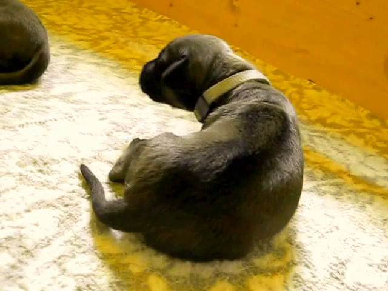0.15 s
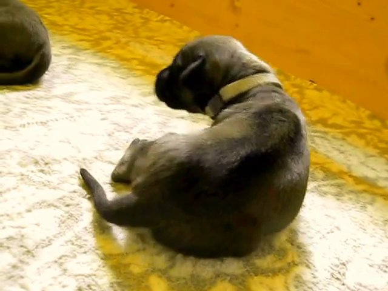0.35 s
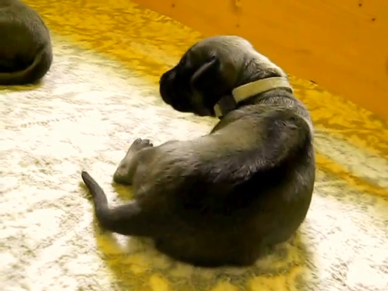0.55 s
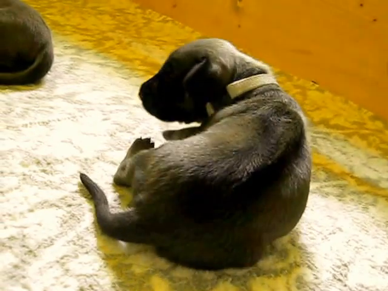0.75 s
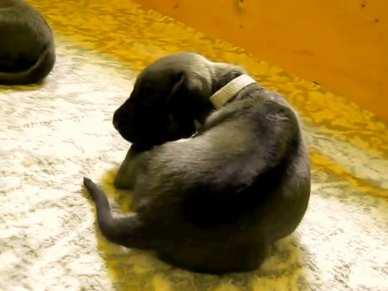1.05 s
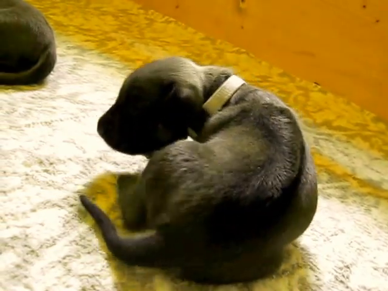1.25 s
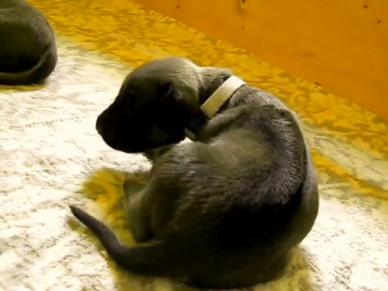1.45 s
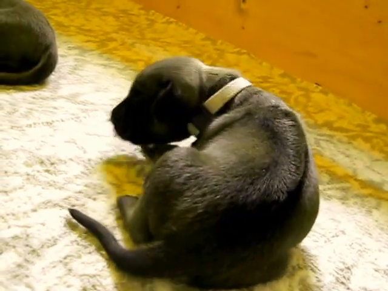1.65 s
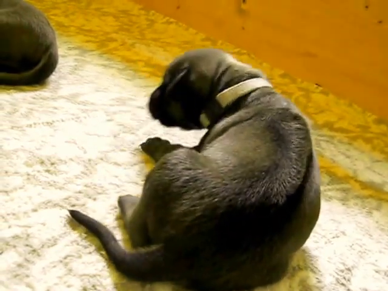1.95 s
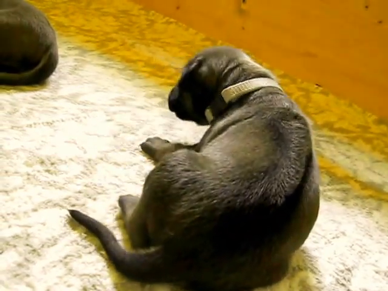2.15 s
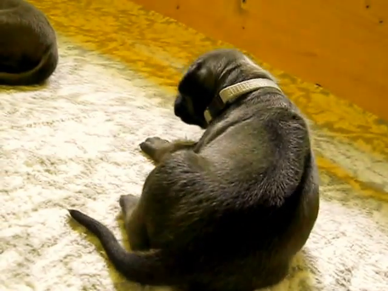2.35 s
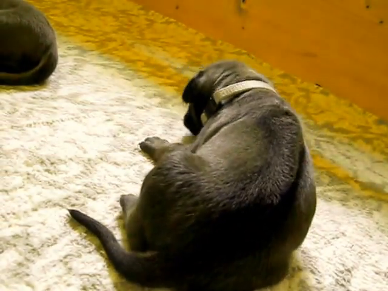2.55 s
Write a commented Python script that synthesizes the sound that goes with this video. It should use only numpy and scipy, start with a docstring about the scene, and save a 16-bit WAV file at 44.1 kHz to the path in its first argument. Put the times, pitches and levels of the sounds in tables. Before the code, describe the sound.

A young puppy whimpers six short squeaky cries, each lower than the last, in a small room.

```python
"""Under a faint bed of coloured noise for room hiss, a young puppy whimpers six times, each cry lower than the last.
The cries are arched stacks of partials with a pop in front, a rough catch at both ends and rasping air on top.
Noise puffs trail the second and third; the fourth and longest breaks into a lower octave. Then come two wet
clicks of dying noise, three grainy strokes of bedding, the fifth cry, one more click and the lowest cry.
Short echoes, a diffuse tail and ringing modes put it all in a small room."""
import sys
import numpy as np
from scipy import signal
from scipy.fft import rfft, irfft, next_fast_len
from scipy.io import wavfile
from scipy.ndimage import uniform_filter1d, map_coordinates

SR = 44100
rng = np.random.default_rng(int(sys.argv[2]) if len(sys.argv) > 2 else 0)


def log_audio(samples):
    """Write samples as a 16-bit WAV file to the path given in sys.argv[1]."""
    # one column per channel
    frames = np.atleast_2d(samples).T
    # limit to full scale, then quantise
    limited = np.clip(frames, -1, 1)
    pcm = np.round(limited * 32767).astype(np.int16)
    wavfile.write(sys.argv[1], SR, pcm)


N = 119070
TOP_HZ = 15850  # band limit of the cries and of the whole mix


def amp(db):
    """Decibels to gain."""
    return 10 ** (np.asarray(db) / 20)


def unit(x):
    """Scale to rms 1."""
    return x / np.sqrt(np.mean(x ** 2) + 1e-20)


def along(points, hz):
    """Read a curve of (Hz, value) points on a log frequency axis."""
    point_hz, values = np.transpose(points)
    return np.interp(np.log(hz + 1), np.log(point_hz + 1), values)


def wobble(rate, span=slice(None)):
    """A smooth random curve, rate knots a second."""
    knots = rng.standard_normal(N // 8)
    return map_coordinates(knots, [np.arange(N)[span] * rate / SR], mode="mirror")


def filtered(x, response):
    """Shape the spectrum of x by a response of frequency."""
    size = next_fast_len(N + SR // 2)
    return irfft(rfft(x, size) * response(np.fft.rfftfreq(size, 1 / SR)), size)[:N]


def noise(colour):
    """Coloured noise of rms 1."""
    return unit(filtered(rng.standard_normal(N), lambda hz: amp(along(colour, hz))))


FLOOR_DB = -55
# Colour of the room hiss: (frequency [Hz], relative density [dB per Hz])
FLOOR = [(25, -7), (300, 0), (1000, -3.5), (2200, -8.5), (9600, -15), (15500, -22)]


def hiss():
    """Steady coloured noise, the faint bed under everything."""
    return amp(FLOOR_DB) * noise(FLOOR)


ROOM_DB, ROOM_DELAY_S, MODE_T60 = -11, .012, 0.33  # tail level, delay of tail and modes, mode decay [s]
# Early echoes off near walls: (delay [s], gain [signed factor])
WALLS = [(.0031, 0.13), (.0074, -.14), (0.0116, .12), (0.0234, .1)]
# Decay of the diffuse tail: (frequency [Hz], time to fall 60 dB [s])
ROOM_T60 = [(300, 0.42), (1000, 0.33), (2000, 0.15), (14000, 0.34)]
# Standing waves of the room: (frequency [Hz], level [dB])
ROOM_MODES = [(646, -1), (785, -2), (1077, -12), (1600, -5), (1935, -3.5)]


def room(x):
    """A few near walls, then a diffuse tail that dies fastest near 2 kHz, and standing waves that ring on."""
    hz, t, grains = signal.stft(rng.standard_normal(SR // 2), SR, nperseg=256)
    decay = amp(-60 * t / along(ROOM_T60, hz)[:, None])
    tail = signal.istft(grains * decay, SR, nperseg=256)[1]
    t = np.arange(len(tail)) / SR
    fade = amp(-60 * t / MODE_T60)
    modes = sum(amp(db) * np.cos(2 * np.pi * f * t) for f, db in ROOM_MODES)
    ring = 2 * fade / fade.sum() * modes
    late = signal.fftconvolve(x, amp(ROOM_DB) * tail / np.linalg.norm(tail) + ring)[:N]
    early = filtered(x, lambda f: sum(g * np.exp(-2j * np.pi * f * s) for s, g in WALLS))
    return early + filtered(late, lambda f: np.exp(-2j * np.pi * f * ROOM_DELAY_S))


# Paws brush the bedding: (centre time [s], time from centre to 1/e [s], level [dB])
RUSTLES = [(1.833, 0.021, -48.5), (1.885, 0.018, -50.5), (1.942, 0.025, -53.5)]
# Colour of the rustle: (frequency [Hz], relative level [dB])
RUSTLE_COLOUR = [(150, -3), (1200, 4), (4200, -6.5), (15000, -23)]


def bedding():
    """Short strokes over the fleece: noise made grainy by a fast random level."""
    t = np.arange(N) / SR
    strokes = sum(amp(db) * np.exp(-((t - s) / spread) ** 2) for s, spread, db in RUSTLES)
    grain = amp(3.4 * wobble(600))
    return strokes * unit(noise(RUSTLE_COLOUR) * grain)


PUFF_SPREAD_S = 0.015  # from the centre to 1/e
# Puffs of air: (centre time [s], level [dB])
PUFFS = [(0.79, -53.5), (1.182, -46.5)]
# Colour of the puffs: (frequency [Hz], relative level [dB])
PUFF_COLOUR = [(1500, 3), (2900, 3), (6000, 14), (9000, 4), (15000, 1)]


def puffs():
    """Air escapes through the puppy's nose as a cry lets go."""
    t = np.arange(N) / SR
    swells = sum(amp(db) * np.exp(-((t - s) / PUFF_SPREAD_S) ** 2) for s, db in PUFFS)
    return noise(PUFF_COLOUR) * swells


CLICK_T60 = 0.02  # time to fall 60 dB [s]
# Wet mouth clicks: (time [s], level at onset [dB])
CLICKS = [(1.7354, -33.5), (1.751, -45), (2.319, -43)]
# Colour of the clicks: (frequency [Hz], relative level [dB])
CLICK_COLOUR = [(200, -19), (1000, 8), (2600, -6), (3600, 0.5), (5500, -3.5), (15000, -11)]


def mouth():
    """Each click is a burst of noise that starts hard and dies at once."""
    t = np.arange(N) / SR
    bursts = sum((t >= s) * amp(db - 60 * np.abs(t - s) / CLICK_T60) for s, db in CLICKS)
    return noise(CLICK_COLOUR) * bursts


POP_RISE_S, POP_LEAD_S = 0.0063, 0.00439  # time to the peak, head start on the cry
# The mouth, rung as the folds burst open: (frequency [Hz], level [dB])
POP_MODES = [(600, -10), (1150, -1.5), (1750, -31)]


def pop(start, pop_db):
    """The folds burst open and ring the mouth for a few cycles."""
    t = np.maximum(np.arange(N) / SR - start + POP_LEAD_S, 0)
    u = t / POP_RISE_S
    swell = (u * np.exp(1 - u)) ** 2
    return amp(pop_db) * swell * sum(amp(db) * np.sin(2 * np.pi * hz * t) for hz, db in POP_MODES)


ATTACK_S, RELEASE_S, ROUGH_END_S = .005, 0.0066, 0.0081
GLIDE_S = 0.0033  # pitch is averaged over this, to round its corners
UPPER_HZ = 1660  # the high overtones begin here and have their full trim an octave up
JITTER, JITTER_HZ, SHIMMER_DB = 0.0014, 448.5, 0.5  # clean voice: share of pitch, knots a second, level
CATCH_JITTER, BREAK_JITTER = 0.088, 0.012  # added jitter where it catches or breaks, share of pitch
CATCH_SUB = 0.43  # gain of the in-between partials in the catch
CATCH_BRIGHT_DB = 0.5  # tight folds lift the second harmonic
BREAK_DULL_DB = -6  # the break drains the third harmonic
FLUTTER_DB, FLUTTER_HZ = 1.94, 69.8  # each partial wavers on its own, more in the break (knots a second)
BREAK_SLIP, SLIP_HZ = 0.34, 130  # in-between partials slip out of step (radians, knots a second)
RASP_DB, CATCH_RASP_DB = -33, 12.5  # air against the voice, and its lift in catch or break
# One table for each cry: (time [s], pitch [Hz], level [dB])
CRY_1 = [(0.223, 848, -31), (0.236, 877, -26.5), (0.254, 986, -28.5), (0.274, 1190, -17.5),
         (0.296, 1279, -21.5), (0.33, 1164, -20.5), (0.351, 1137, -21.5), (0.36, 1060, -31)]
CRY_2 = [(0.629, 724, -34), (0.652, 707.5, -34.5), (0.668, 905, -21), (0.681, 1011, -32.5),
         (0.702, 1047, -21.5), (0.72, 1035, -26), (0.731, 913, -29.5), (0.744, 868, -21.5),
         (0.783, 756.5, -27)]
CRY_3 = [(1.025, 516, -48), (1.038, 476, -28), (1.079, 537.4, -22.5), (1.11, 606, -21.5),
         (1.135, 646, -26.5), (1.156, 643.8, -23), (1.161, 524, -19.5), (1.168, 505, -32.5)]
CRY_4 = [(1.449, 545, -44), (1.458, 532, -33.5), (1.478, 463, -29.5), (1.498, 491.7, -26),
         (1.54, 581.4, -27.5), (1.58, 527.3, -27), (1.615, 548.1, -23), (1.656, 533.4, -22),
         (1.667, 520, -31.5), (1.675, 410, -29), (1.684, 427, -37.5)]
CRY_5 = [(1.968, 472, -50), (1.982, 437.3, -41), (2.0, 432.8, -32), (2.024, 389.6, -31.5),
         (2.046, 436.6, -28.5), (2.072, 456.3, -24.5), (2.086, 426, -28.5), (2.096, 421, -45)]
CRY_6 = [(2.38, 443.5, -45), (2.402, 398.7, -36), (2.42, 357.6, -35), (2.444, 376.6, -26.5),
         (2.456, 366, -47.5)]
# The cries in turn: (cry table, rough start [s], opening pop [dB], high overtones [dB], fourth harmonic [dB])
CRIES = [(CRY_1, 0.0028, -30, -8, 0), (CRY_2, 0.036, -26.5, 0, 0), (CRY_3, 0.01105, -36, 0.53, -11),
         (CRY_4, 0.028, -32.5, -5, -7), (CRY_5, 0.04, -48, -8.5, -17.5), (CRY_6, 0.028, -35, -38, -1.4)]
# The folds beat unevenly, adding the octave below: (time [s], gain of in-between partials [factor])
BREAK = [(1.535, 0.34), (1.56, 0.64), (1.59, 0.58), (1.625, 0.28), (1.665, 0)]
# Throat and mouth resonance: (frequency [Hz], relative level [dB])
THROAT = [(250, -41), (400, -8.5), (620, -7), (750, -1.5), (815, -3), (880, 0.5), (1180, 1.5), (1420, -8),
          (1650, -7.5), (2080, -14.5), (2200, -29), (2450, -28), (3000, -52.5), (3900, -41), (4700, -46.5),
          (5800, -20), (7000, -37), (8800, -50), (10300, -33.5), (13300, -47), (15000, -45)]
# Air rasping through the folds: (frequency [Hz], relative density [dB per Hz])
RASP = [(300, -53), (1200, -52), (2400, 4), (4700, -24.5), (5700, -5.5), (8800, -1), (12000, -1.5),
        (13400, -17), (15000, -18)]


def cry(rows, rough_start, pop_db, overtones_db, fourth_db, count=80):
    """Vocal folds ring the throat; they catch at both ends, and the rasping air swells once a cycle."""
    s, *columns = np.transpose(rows)
    now = np.arange(N) / SR
    span = (now > s[0] - ATTACK_S) & (now < s[-1] + RELEASE_S)
    t = now[span]
    pitch, level_db = (np.interp(t, s, c) for c in columns)
    pitch = uniform_filter1d(pitch, int(GLIDE_S * SR) + 1, mode="nearest")
    gate = np.sin(np.pi / 2 * np.interp(t, [t[0], s[0], s[-1], t[-1]], [0, 1, 1, 0])) ** 2

    catch_in = np.exp(-(np.maximum(t - s[0], 0) / rough_start) ** 2)
    catch_out = np.exp(-(np.maximum(s[-1] - t, 0) / ROUGH_END_S) ** 2)
    catch = np.maximum(catch_in, catch_out)
    broken = np.interp(t, *np.transpose(BREAK), left=0, right=0)
    jitter = JITTER + CATCH_JITTER * catch + BREAK_JITTER * broken
    phase = 2 * np.pi * np.cumsum(pitch * (1 + jitter * wobble(JITTER_HZ)[span])) / SR

    # Whole orders are harmonics; the halves between them give the lower octave
    order = 1 + np.arange(count)[:, None] / 2
    hz = order * pitch
    colour_db = along(THROAT, hz) + overtones_db * np.clip(hz / UPPER_HZ - 1, 0, 1)
    colour_db += fourth_db * (order == 4)
    colour_db += BREAK_DULL_DB * broken * (order == 3)
    colour_db += CATCH_BRIGHT_DB * catch * (order == 2)
    colour_db += FLUTTER_DB * (1 + broken) * np.array([wobble(FLUTTER_HZ, span) for _ in order])
    share = np.where(order % 1 == 0, 1, broken + CATCH_SUB * catch)
    gains = amp(colour_db) * share * (hz < TOP_HZ)

    slip = BREAK_SLIP * broken * np.array([wobble(SLIP_HZ, span) for _ in order]) * (order % 1 > 0)
    start_phase = rng.uniform(0, 2 * np.pi, (count, 1))
    partials = gains * np.sin(order * phase + slip + start_phase)
    tone = partials.sum(0) / np.sqrt((gains ** 2).sum(0) / 2)  # even power, so the level curve rules
    voice = amp(level_db + SHIMMER_DB * wobble(JITTER_HZ)[span]) * tone

    air_db = level_db + RASP_DB + CATCH_RASP_DB * np.maximum(catch, broken)
    air = amp(air_db) * noise(RASP)[span] * (1 + .5 * np.cos(phase))
    out = pop(s[0], pop_db)
    out[span] += gate * (voice + air)
    return out


def scene():
    """The puppy and its bedding in the room, over the hiss."""
    puppy = sum(cry(*row) for row in CRIES) + puffs() + mouth() + bedding()
    return (puppy + room(puppy) + hiss())[None]


NOTCH_HZ, NOTCH_WIDTH_HZ = 7886, 676  # centre, and distance to the half-depth point


def record(dry):
    """Cut a deep notch in the treble and keep nothing above the band limit."""
    def response(hz):
        offset = np.abs(hz - NOTCH_HZ) ** 2
        notch = offset / (offset + NOTCH_WIDTH_HZ ** 2) * 0.92 + 0.04  # gain 0.04 at the bottom
        return notch * (hz < TOP_HZ)
    return filtered(dry[0], response)[None]


dry = scene()
out = record(dry)
log_audio(out)
```